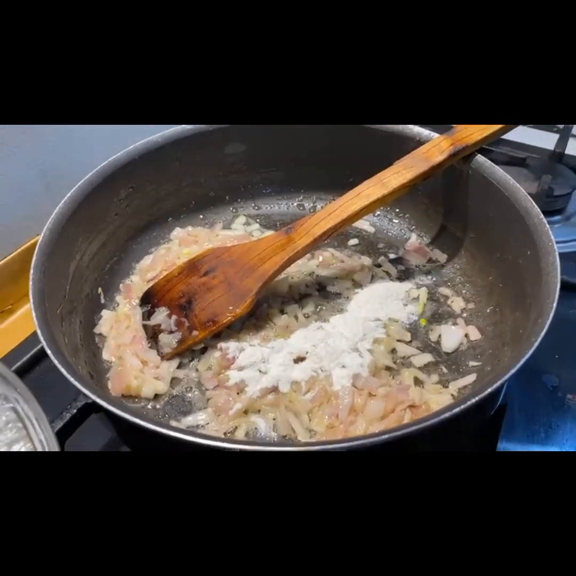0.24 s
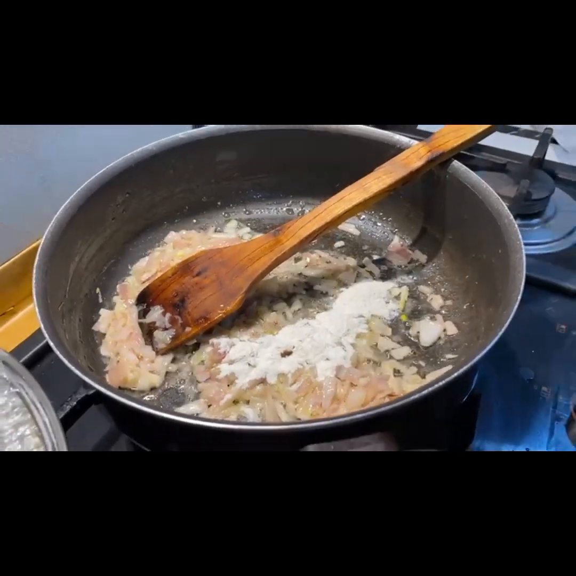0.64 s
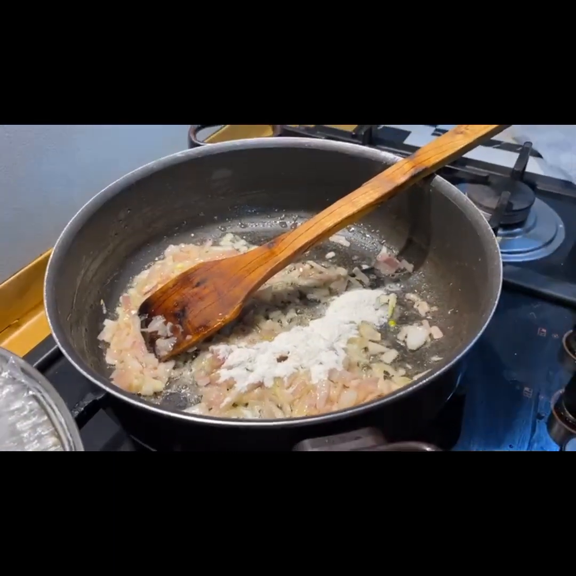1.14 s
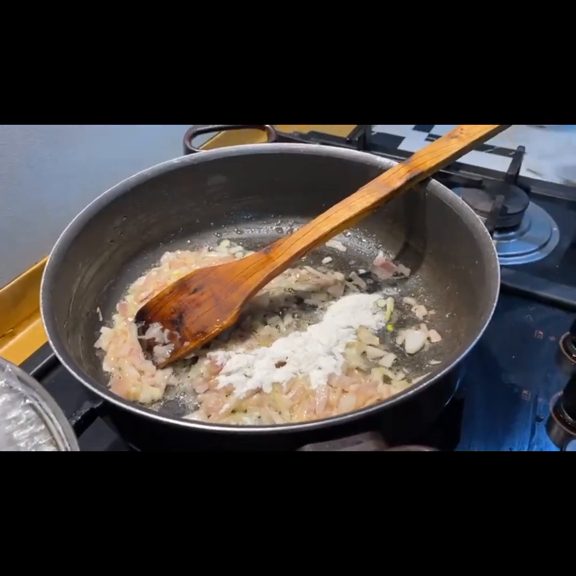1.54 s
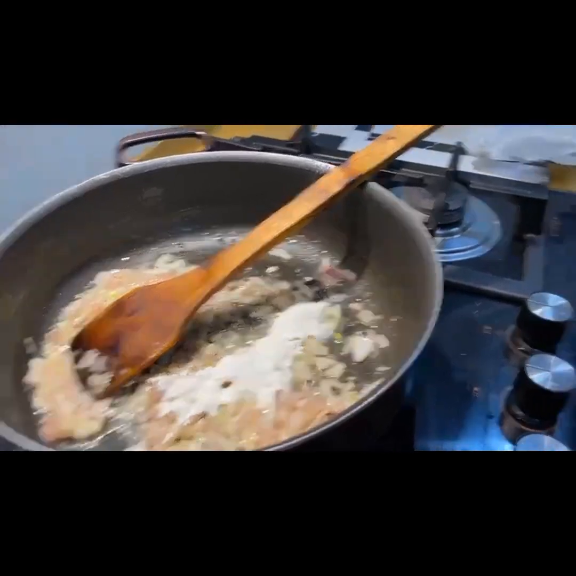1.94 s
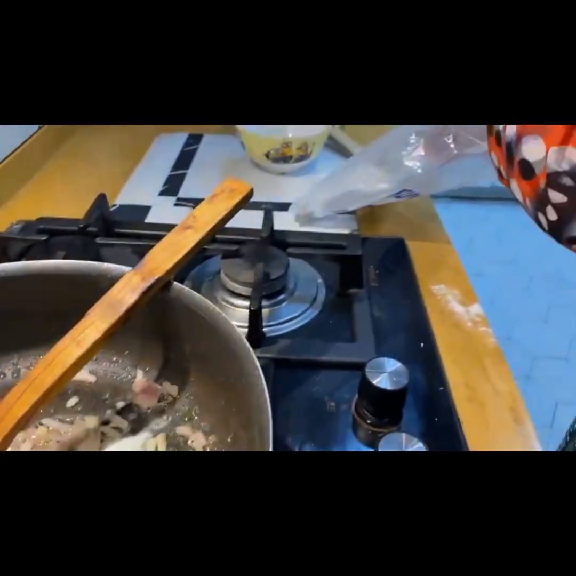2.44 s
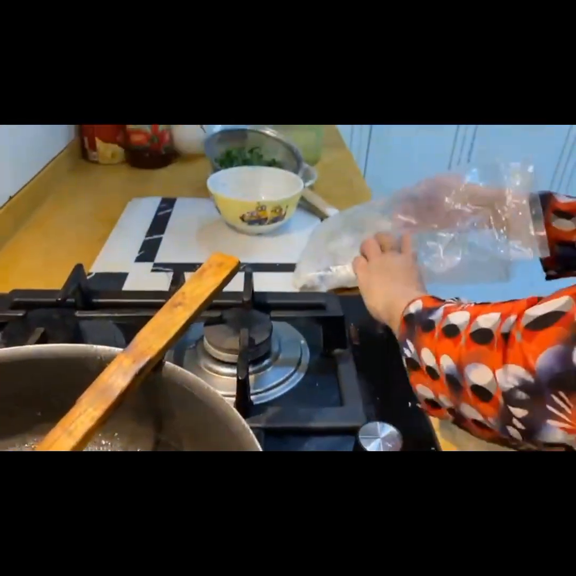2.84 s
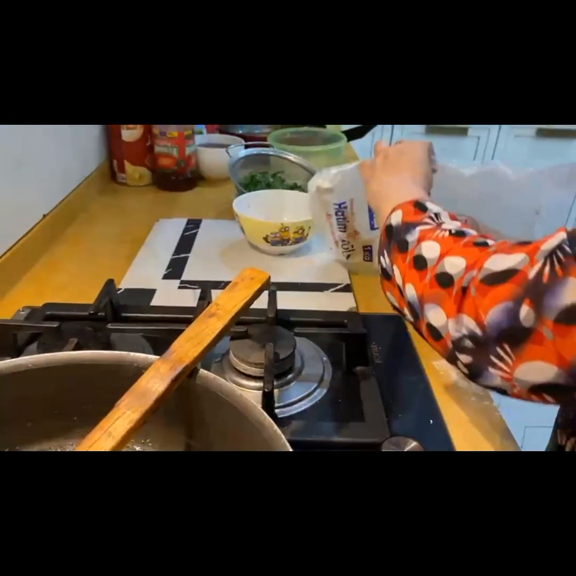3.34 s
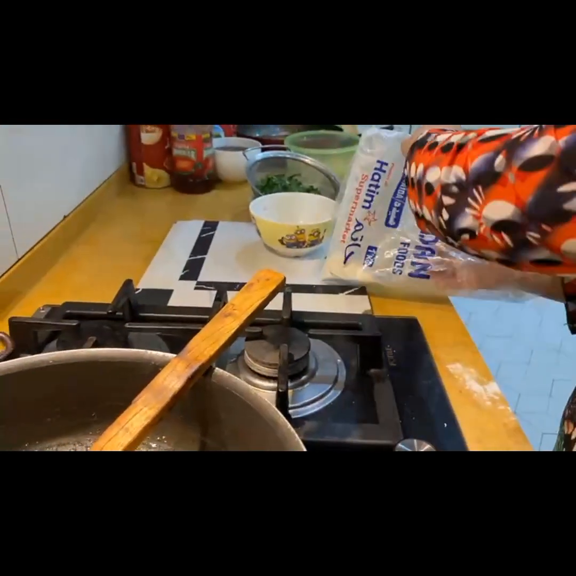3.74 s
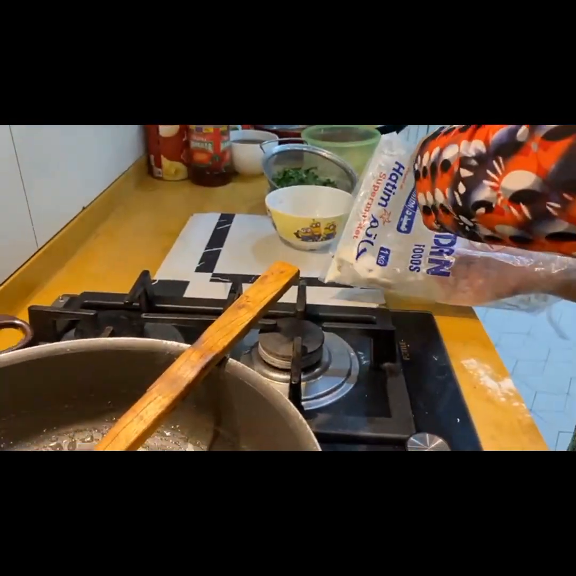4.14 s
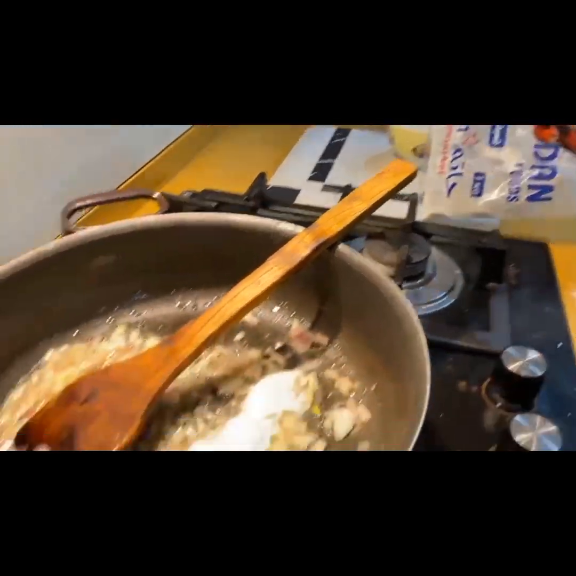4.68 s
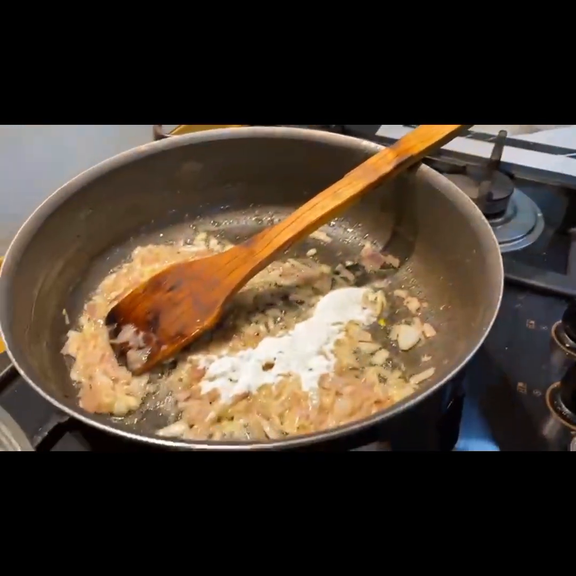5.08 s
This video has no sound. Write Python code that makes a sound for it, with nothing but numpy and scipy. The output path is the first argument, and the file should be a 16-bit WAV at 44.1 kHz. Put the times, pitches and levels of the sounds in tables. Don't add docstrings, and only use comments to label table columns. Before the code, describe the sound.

Chopped onions sizzle densely and steadily in a pan under a low humming hood, while a plastic bag crumples and snaps a little further off.

```python
import sys
import numpy as np
from scipy import signal
from scipy.fft import rfft, irfft
from scipy.io import wavfile
from scipy.ndimage import uniform_filter1d

SR = 44100
rng = np.random.default_rng(int(sys.argv[2]) if len(sys.argv) > 2 else 0)


def boost(x):
    u = np.asarray(x, float) / 20
    return 10 ** u


def generate_wav(sig):
    pcm = np.round(np.clip(np.atleast_2d(sig).T, -1, 1) * 32767).astype(np.int16)
    wavfile.write(sys.argv[1], SR, pcm)


N = 234303

# frequency in Hz, level in dB.
BURST_COLOUR = [(60, -49), (300, -22.5), (900, -5), (2000, -7.5), (3500, -0.5), (5000, 0.87), (6800, 4),
                (8500, 5.5), (9800, -1), (11000, 0.6), (11700, -3), (12100, -36), (12700, -50),
                (14000, -73)]
# frequency in Hz, level in dB.
SCATTER_COLOUR = [(300, -0.5), (2000, 5.5), (3000, -3), (3900, -7), (5300, -6), (6300, -15.5), (7000, -23),
                  (9000, -38), (12000, -17.5)]
RIM_S, RIM_DB = 0.0014, -10


def evened(x):
    return x / np.sqrt(np.mean(x ** 2) + 1e-20)


def read(points, hz):
    f, value = np.transpose(points)
    return np.interp(np.log(hz + 1), np.log(f + 1), value)


def follow(rows):
    s, db = np.transpose(rows)
    return boost(np.interp(np.arange(N) / SR, s, db, left=-120))


def add(mix, s, sound):
    part = mix[round(s * SR):][:len(sound)]
    part += sound[:len(part)]


def colour(points):
    log_gain = np.log(boost(read(points, abs(np.fft.fftfreq(2048, 1 / SR)))))
    return np.fft.ifft(np.exp(np.conj(signal.hilbert(log_gain)))).real[:1024]


def resonate(x, hz, width):
    pole = np.exp((2j * np.pi * hz - np.pi * width) / SR)
    return 2 * signal.lfilter([1 - abs(pole)], [1, -pole], x).real


def clicks(per_s, spread_db):
    chance, size, sign = rng.random(N), rng.exponential(1, N), rng.choice([-1., 1.], N)
    return (chance < per_s / SR) * boost(spread_db * np.minimum(size, 6)) * sign


def patchy(x, patchy_db):
    z = signal.stft(x, nperseg=512)[2]
    field = uniform_filter1d(rng.standard_normal(z.shape[-2:]), size=8, axis=0)
    field = evened(uniform_filter1d(field, size=12, axis=1))
    return signal.istft(z * boost(patchy_db * field), nperseg=512)[1][..., :N]


def scatter(x, t60, points):
    t = np.arange(SR // 4) / SR
    tail = rng.standard_normal((2, len(t))) * boost(-60 * t / t60) * (t > .001)
    tail = signal.fftconvolve(tail / np.linalg.norm(tail[0]), colour(points)[None], axes=1)
    return signal.fftconvolve(x[None], tail, axes=1)[:, :N]


def throb():
    # middle in seconds, level in dB, pitch in Hz.
    gusts = [(0.167, -38, 104), (0.301, -33, 130), (0.46, -31.5, 134), (.53, -37, 109), (0.569, -36, 118),
             (0.749, -42, 113), (1.258, -41.5, 109), (1.551, -43, 109), (1.73, -53, 106), (1.821, -47, 102),
             (2.048, -36.5, 100), (2.173, -40, 102), (2.743, -51, 115), (2.96, -35, 106), (3.33, -36, 96),
             (3.98, -45, 104), (4.3, -44, 114), (4.763, -38, 109), (4.907, -42, 114)]
    t, gust_s = np.arange(N) / SR, 0.014
    return sum(boost(db) * np.exp(-((t - s) / gust_s) ** 2) * np.cos(2 * np.pi * hz * (t - s))
               for s, db, hz in gusts)


def hood():
    # frequency in Hz, level in dB.
    air_colour = [(15, -44), (25, 6), (69, 3), (102, -9), (205, -58), (245, -15), (405, -7), (430, -13),
                  (592, -10), (642, -19), (1020, -12.5), (1220, -31.5), (3000, -51), (3900, -73),
                  (6600, -119)]
    # pitch in Hz, width in Hz, level in dB.
    duct_modes = [(236.5, 149, -53.5), (395.5, 6.3, -67.5), (610.5, 26, -66), (714, 190, -68.5),
                  (1082, 200, -65)]
    # pitch in Hz, width in Hz, level in dB.
    boom_modes = [(99.3, 18.4, -5), (118, 13, -8), (142.4, 21.8, -9), (82.8, 35, -14)]
    # frequency in Hz, left-right likeness as a share.
    likeness = [(30, .8), (60, 1), (130, 0.94), (270, 0.57), (590, 0.16), (1250, 1), (2670, -1.1),
                (12200, -0.25)]
    # frequency in Hz, lead at the left port in radians.
    swirl = [(800, 0.042), (1300, 1.3), (1800, 1.5), (2500, 0.9), (3300, .1)]
    common, own = rng.standard_normal((2, N))
    hz = np.fft.rfftfreq(N, 1 / SR)
    same = np.clip(read(likeness, hz), -1, 1)
    shared = same * np.exp(-1j * read(swirl, hz)) * rfft(common)
    air = np.array([common, irfft(shared + np.sqrt(1 - same ** 2) * rfft(own), N)])

    def ring(modes):
        return sum(boost(db) * evened(resonate(resonate(air, f, width), f, width)) for f, width, db in modes)

    rush = boost(-49) * evened(irfft(rfft(air) * boost(read(air_colour, hz)) * hz / (hz + 220), N))
    return rush + ring(duct_modes) + boost(-48) * evened(ring(boom_modes)) + throb()


def squeeze():
    # start in seconds, hold in seconds, level in dB.
    squeezes = [
        (2.818, 0.041, -47.5),
        (2.894, 0.165, -45.5),
        (3.13, 0.12, -50.5),
        (3.245, 0.023, -51.5),
        (3.282, 0.037, -47.5),
        (3.404, 0.11, -59),
        (3.635, 0.15, -59),
        (3.907, 0.02, -61),
        (4.336, 0.077, -50.5),
    ]
    t, grip_s, let_go_s = np.arange(N) / SR, 0.022, 0.01
    effort = boost(-56.5) * (t > 2.4)
    for s, hold, db in squeezes:
        grip = np.clip((t - s) / grip_s, 0, 1)
        effort = effort + boost(db) * grip * np.exp(-np.maximum(t - s - grip_s - hold, 0) / let_go_s)
    return effort


def bag():
    # start in seconds, peak in dB, low and high pocket in Hz.
    buckles = [(0.549, -40, 790, 1960), (1.652, -40.5, 880, 1860), (1.891, -37, 900, 2000),
               (2.582, -36.5, 800, 3400), (2.836, -38, 620, 1300), (2.874, -44, 746, 2600),
               (2.902, -36, 740, 1460), (2.941, -31.5, 820, 1300), (3.024, -34, 1300, 1780),
               (3.062, -30.5, 930, 1300), (3.045, -35.5, 585, 860), (4.7, -38, 700, 1050),
               (3.172, -41, 580, 870), (3.725, -40.5, 800, 1040), (3.245, -39.5, 270, 760),
               (3.14, -44, 880, 1000), (3.19, -39, 710, 1200), (4.399, -41, 870, 1200),
               (3.317, -37, 740, 1850), (3.523, -34, 704, 2000), (3.534, -38, 680, 2000),
               (3.515, -36, 930, 1540), (3.075, -36.5, 690, 2200), (3.851, -40, 1040, 2000),
               (4.458, -38.5, 1040, 2600), (4.807, -41, 850, 2300)]
    # start in seconds, peak in dB, low and high pocket in Hz.
    cracks = [(1.456, -42.5, 970, 2040), (1.79, -38, 990, 1890), (2.928, -38.5, 730, 1950),
              (2.959, -35.5, 670, 1310), (2.993, -35, 1470, 4270), (3.223, -37, 3200, 2860),
              (3.246, -38, 2407, 3060), (3.687, -39.5, 1030, 1720), (4.717, -38, 1520, 1870),
              (4.728, -45, 1900, 2720), (5.099, -40, 890, 1690)]
    # start in seconds, peak in dB, low and
    # high pocket in Hz.
    further_pops = [(2.511, -39.5, 1000, 1550), (1.314, -45, 1050, 1700), (1.811, -41.5, 780, 1220),
                    (4.015, -39, 800, 1140), (3.209, -46, 770, 3000), (3.706, -45, 600, 2500),
                    (3.811, -43, 1000, 1900), (4.046, -49, 1100, 1500), (3.922, -46, 750, 1000),
                    (3.977, -43, 870, 3400), (4.013, -40, 1500, 3500), (5.03, -53, 1100, 1900)]
    # frequency in Hz, level in dB.
    crumple_colour = [(88, -19), (173, 9), (330, -7), (500, -3.5), (750, -4.5), (1080, -8), (1900, -14),
                      (2600, -14.5), (7000, -12), (9100, -67)]
    events = [(*row, 0.025, -3.5) for row in buckles]
    events += [(*row, 0.036, 1) for row in cracks]
    events += [(*row, 0.027, -0.5) for row in further_pops]
    out, t = np.zeros(N), np.arange(6000) / SR
    counter_s, counter_db = 0.001676, -16.5
    width = 0.34
    all_slips = rng.standard_normal((len(events), len(t)))
    for (s, db, low_hz, high_hz, t60, edge_db), slips in zip(events, all_slips):
        flurry = slips ** 3 * boost(-60 * t / t60)
        flurry[0] = 11
        flurry = flurry + boost(counter_db) * np.roll(flurry, round(counter_s * SR))
        low = resonate(resonate(flurry, low_hz, width * low_hz), low_hz, width * low_hz)
        high = resonate(resonate(flurry, high_hz, width * high_hz), high_hz, width * high_hz)
        third_pocket = resonate(flurry, 1.22 * high_hz, 400)
        edge = resonate(flurry, 2200, 1600) + boost(27) * third_pocket
        bright = high / abs(high).max() + boost(-1.0) * edge / abs(edge).max()
        add(out, s + .0005, boost(db - 1.0) * (low / abs(low).max() + boost(edge_db) * bright))
    crackle = evened(signal.oaconvolve(clicks(per_s=2500, spread_db=3.5), colour(crumple_colour))[:N])
    out = out + boost(-2.5) * squeeze() * patchy(crackle, patchy_db=3.5)
    body_in_the_way = [(100, -20.0), (300, 5.5), (5000, 3.0), (8000, -12.0), (11000, -39)]  # (Hz, dB)
    return signal.oaconvolve(out, colour(body_in_the_way))[:N]


def snap_through():
    # start in seconds, peak in dB, then low, middle and high pocket in Hz.
    snaps = [(0.1216, -30.5, 1820, 1950, 2420), (0.2478, -29.5, 750, 980, 1940),
             (0.251, -24.5, 740, 950, 994), (1.2182, -32, 3330, 3840, 4300), (1.219, -33, 1700, 2200, 2750),
             (1.2725, -33, 2520, 3580, 4500), (2.9071, -31.5, 694, 1760, 3000),
             (2.961, -35, 700, 1750, 3020), (2.954, -32, 1820, 2880, 3280),
             (2.942, -25.5, 1220, 1970, 2920), (2.934, -32, 1000, 1500, 1910),
             (2.9942, -32, 1310, 1690, 3260), (2.996, -24, 790, 1510, 2590), (3.007, -33, 1290, 1810, 2320),
             (3.033, -33, 1090, 1600, 2100), (3.0184, -27.5, 1360, 1730, 2180),
             (3.2237, -24, 2320, 3300, 3600), (3.228, -28.5, 3200, 3450, 2660),
             (3.242, -24, 2260, 2490, 3500), (3.2462, -37, 2280, 2940, 3400),
             (3.318, -28.5, 1410, 2150, 3430), (3.5145, -29, 950, 1170, 2050),
             (3.9335, -31, 2600, 2780, 4580), (3.959, -28, 1500, 1650, 2230),
             (3.9745, -27, 860, 2140, 2370), (4.028, -21.5, 920, 1570, 2320),
             (4.028, -25.5, 1760, 1900, 2860), (4.0335, -32, 2400, 3340, 3480),
             (4.7178, -30, 1420, 1600, 1910), (4.7265, -31, 1780, 2030, 4340),
             (4.73, -41, 1900, 2280, 3120), (5.1005, -28.5, 2500, 3300, 3600),
             (5.105, -47, 1800, 1980, 2500), (5.112, -29, 1260, 1460, 1890),
             (4.3789, -20.5, 1380, 1840, 2840), (4.3784, -26, 870, 3660, 5470),
             (4.3835, -40, 1760, 2780, 3600)]
    out, t = np.zeros(N), np.arange(1500) / SR
    for (s, db, *pockets), rattle in zip(snaps, rng.standard_normal((len(snaps), len(t)))):
        slip = boost(-50 - 60 * t / 0.032) * rattle
        slip[0] = 1
        ring = sum((-1) ** k * resonate(slip, hz, 96) for k, hz in enumerate(pockets))
        ring = ring + boost(-16) * resonate(slip, np.mean(pockets), 2000) / 3
        add(out, s, boost(db) * ring / abs(ring).max())
    return out


def mist():
    # start in seconds, peak in dB, pitch in Hz.
    finest = [(0.1685, -42, 11500), (0.5412, -40, 11500), (0.604, -45, 11300), (0.6888, -40, 11300),
              (1.1029, -36, 11600), (1.571, -41, 10800), (1.5844, -37, 10400), (2.1914, -35, 10500),
              (2.4304, -39, 11200), (2.5346, -26, 10900), (2.5601, -36, 11000), (2.6923, -36, 10400),
              (3.043, -49, 11300), (3.043, -34, 10600), (3.0864, -33, 11200), (3.2081, -33, 10500),
              (3.5129, -38, 11000), (4.0317, -33, 10300), (4.4254, -41, 11300), (4.4654, -40, 10600),
              (4.717, -45, 10500), (4.9067, -36, 11100), (5.027, -41, 11300)]
    out, tick = np.zeros(N), np.zeros(300)
    tick[[0, round(RIM_S * SR)]] = 1, boost(RIM_DB)
    for s, db, hz in finest:
        ring = resonate(resonate(tick, hz, 1000), hz, 1000)
        add(out, s + 0.0011, boost(db) * ring / abs(ring).max())
    return out


def spits():
    # start in seconds, peak in dB, pitch in Hz, brightness from 0 to 1.5.
    spit_events = [(0.429, -35, 7600, 0.3), (0.6892, -42, 7140, 1), (0.8887, -35.5, 5530, 1),
                   (1.0516, -40, 7400, 0.4), (1.3415, -45, 6480, 0.5), (2.288, -40, 6810, 0.5),
                   (3.82, -51, 4960, 0.2), (4.047, -43, 5500, 0.2), (1.076, -38, 6930, 0.3),
                   (1.1038, -32.5, 7000, 0.6), (1.108, -39, 3000, 0.2), (1.435, -42, 6810, 0.8),
                   (2.536, -31.5, 7360, 1), (2.6931, -35.5, 6780, 1), (2.994, -33, 4740, 0),
                   (3.073, -36, 7200, 0.3), (3.1265, -33.5, 6040, 0.2), (3.2241, -33, 7000, 0.5),
                   (3.5139, -31, 6700, 0), (3.5212, -35.5, 6800, 0.4), (3.525, -37, 5600, 0.1),
                   (3.5238, -35.5, 4500, 0.3), (0.1691, -40, 6300, 0.7), (3.668, -38, 7000, 0.6),
                   (3.672, -43, 7000, 0.7), (3.933, -36, 6460, 0), (4.0285, -32.5, 3460, 0.3),
                   (4.035, -46, 5600, 0.3), (4.2146, -41, 5700, 0.5), (4.277, -37.5, 6260, 0.4),
                   (4.3793, -44, 5400, 0), (4.726, -36, 7300, 0.7), (4.769, -39, 6800, 0.3),
                   (4.856, -40, 7410, 0.8), (4.9195, -30.5, 7800, 0.8), (4.9566, -36, 6970, 0.9),
                   (4.971, -36, 7660, 1), (5.099, -43.5, 5400, 0.3), (5.027, -42, 7200, 0.3),
                   (5.14, -37, 7320, 0.3), (5.225, -39, 6640, 0.7), (5.287, -32.5, 6770, 0.08)]
    out, t, spray_t60_s = np.zeros(N), np.arange(2600) / SR, 0.096
    burst = (colour(BURST_COLOUR)[:32] * np.hanning(64)[32:])[::-1]
    sprays = rng.standard_normal((len(spit_events), len(t)))
    for (s, db, hz, bright), spray in zip(spit_events, sprays):
        drive = boost(-29.5 - 60 * t / spray_t60_s) * spray
        drive[[0, round(RIM_S * SR)]] = 1, boost(RIM_DB)
        dullness = np.clip(.7 - bright, -.8, .8)
        pop = signal.lfilter([1], [1, -dullness], np.convolve(drive, burst))
        pop = pop + boost(3.0) * resonate(pop, hz, 0.22 * hz)
        add(out, s + .0001, boost(db + 14.0) * pop / abs(pop).max())
    return out


def bubbles():
    tiny = evened(clicks(per_s=14000, spread_db=2.5))
    big = evened(clicks(per_s=600, spread_db=-0.5))
    return evened(signal.oaconvolve(tiny + boost(-17.5) * big, colour(BURST_COLOUR))[:N])


def droplets():
    pitches = np.geomspace(1300, 6000, num=10)
    return evened(sum(resonate(clicks(per_s=12, spread_db=3), hz, 0.055 * hz) for hz in pitches))


def sizzle():
    # time in seconds, level in dB.
    strength = [
        (0.0, -50.5),
        (1.1, -53),
        (1.6, -51),
        (1.85, -52),
        (2.6, -52),
        (4.3, -51),
        (5.31, -51),
    ]
    # time in seconds, level in dB.
    turn_levels = [
        (0, 5),
        (2.0, 5),
        (2.4, 5),
        (4.6, 5),
        (5.31, 4.5),
    ]
    noise = rng.standard_normal(N)
    flicker = evened(signal.lfilter([1], [1, -np.exp(-2 * np.pi * 14 / SR)], noise))
    boil = follow(strength) * boost(6.5 + 0.27 * flicker)
    direct = patchy(bubbles(), patchy_db=1.5) + boost(-16.5) * droplets()
    two_fields = np.array([bubbles(), bubbles()])
    around = signal.oaconvolve(two_fields, colour(SCATTER_COLOUR)[None], axes=1)[:, :N]
    return boil * direct, boil * follow(turn_levels) * patchy(around, patchy_db=1.2)


def scene():
    # frequency in Hz, lag in cycles.
    port_lag = [(0, 0.18), (2500, -0.03), (4000, 0), (5500, 0.16), (6900, 0.0), (9050, 0.549),
                (11000, 0.89), (14000, 1.25)]
    (direct, around), pops, film, snap = sizzle(), spits() + mist(), bag(), snap_through()
    cycles = np.interp(np.fft.rfftfreq(N, 1 / SR), *np.transpose(port_lag))
    late = irfft(rfft(direct + pops) * np.exp(-2j * np.pi * cycles), N)
    pan = np.array([late, direct + pops]) + around + boost(1.0) * scatter(pops, 0.093, SCATTER_COLOUR)
    room_colour = [(200, -2.0), (3000, 6.5), (9000, 7), (14000, -68)]  # (Hz, dB)
    kitchen = boost(-6.0) * scatter(film + boost(-3.5) * snap, 0.16, room_colour)
    return pan + boost(-1.5) * film + boost(-1.5) * snap + kitchen + hood()


def thinned(x):
    # frequency in Hz, depth under the other channel in dB.
    drop_depth = [(2000, 25), (3200, 6), (3900, 2.5), (4600, 6.5), (5500, 6), (6100, 6), (6700, 11),
                  (7400, 3), (9000, 5), (10300, 0), (11500, 1.5)]
    # middle in seconds, length in seconds.
    whole_attacks = [
        (.69, .04),
        (1.103, .012),
        (2.536, .022),
        (3.516, .03),
        (4.92, .045),
        (5.29, .025),
    ]
    frame_start = 495
    window = np.sin(np.pi * (np.arange(2048) + .5) / 2048)
    sum_and_difference = np.roll([x[0] + x[1], x[0] - x[1]], -frame_start, axis=1)
    hz, t, z = signal.stft(sum_and_difference, SR, window, 2048, 1024)
    power = abs(z) ** 2
    near = uniform_filter1d(power, size=10, axis=1)
    wide = uniform_filter1d(power, size=32, axis=1)
    vary_db = 2.2 * np.repeat(rng.standard_normal((65, len(t))), 16, axis=0)[:len(hz)]
    swamped = near * boost(2 * (read(drop_depth, hz)[:, None] + vary_db)) < wide[::-1]
    faint = (near < boost(2 * -88)) & (hz > 9000)[:, None]
    kept = uniform_filter1d(1. * ~(swamped | faint), size=7, axis=1) > .5
    kept = kept & ((power > near * boost(2 * -6)) | (hz < 1100)[:, None])
    back = signal.istft(z * kept, SR, window, 2048, 1024)[1][:, :N]
    mid, side = np.roll(back, frame_start, axis=1)
    whole = np.zeros(N)
    for s, length in whole_attacks:
        add(whole, s - length / 2, signal.windows.tukey(round(length * SR), .5))
    return whole * x + (1 - whole) * np.array([mid + side, mid - side]) / 2


def band_limit(x):
    return signal.sosfilt(signal.butter(12, 12800, fs=SR, output="sos"), x)


def record(dry):
    # frequency in Hz, level in dB.
    microphone = [(20, -16), (50, -0.5), (12000, 1), (12500, -12), (13000, -40)]
    # frequency in Hz, left minus right in dB.
    lean = [(60, 1.5), (130, 2.5), (270, -1.0), (590, 2.5), (1250, 1.0), (2670, 1.5), (5710, 1.0),
            (12200, 0.0)]
    hz = np.fft.rfftfreq(N, 1 / SR)
    response_db = read(microphone, hz) + np.outer([.5, -.5], read(lean, hz))
    mix = thinned(irfft(rfft(dry) * boost(response_db), N))
    return band_limit(mix)


dry = scene()
out = record(dry)
generate_wav(out)
```